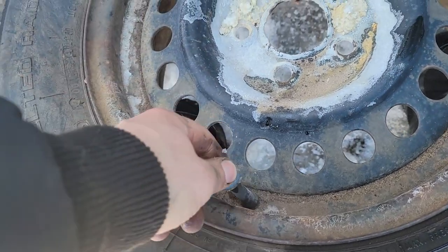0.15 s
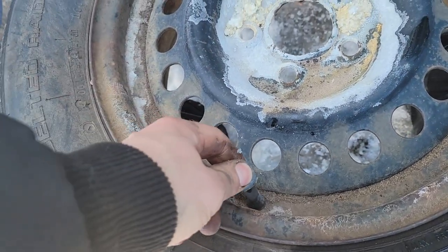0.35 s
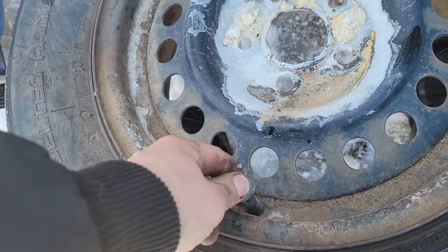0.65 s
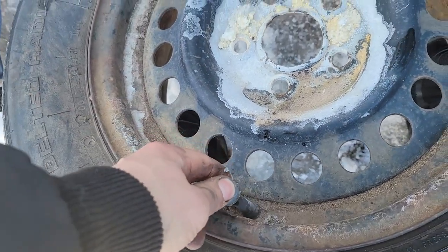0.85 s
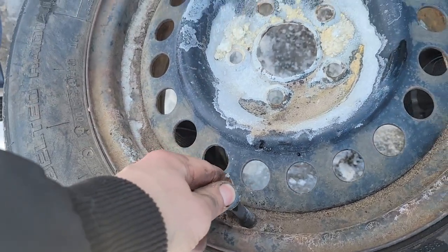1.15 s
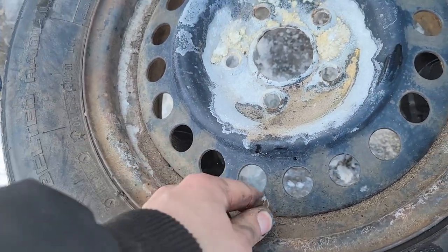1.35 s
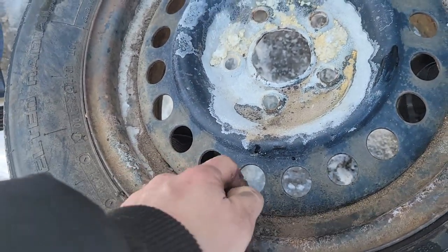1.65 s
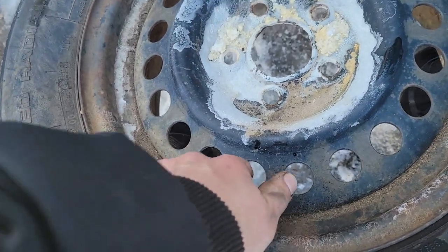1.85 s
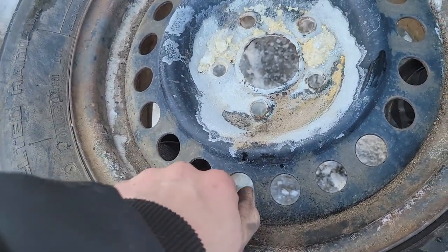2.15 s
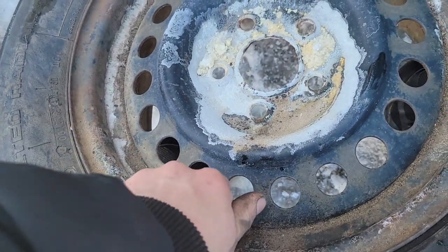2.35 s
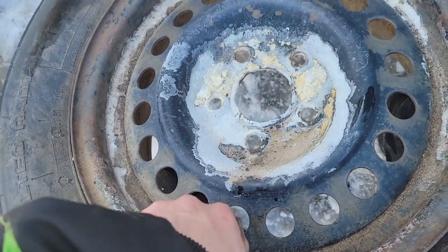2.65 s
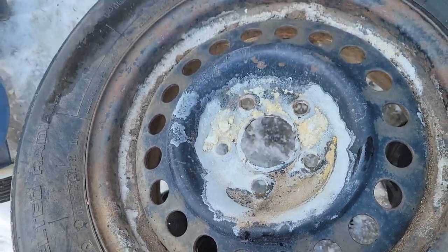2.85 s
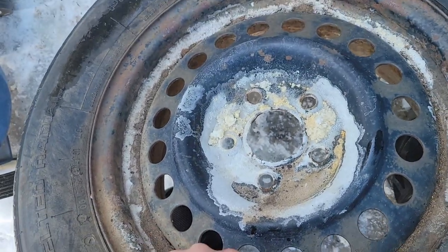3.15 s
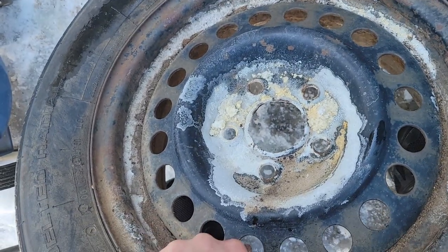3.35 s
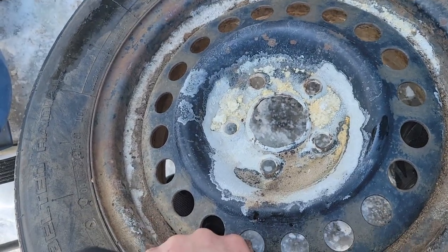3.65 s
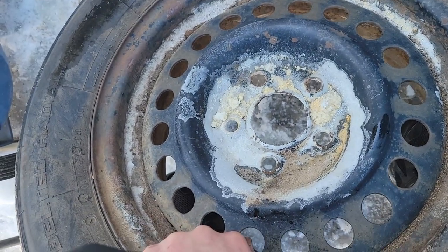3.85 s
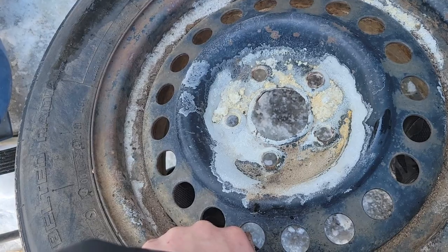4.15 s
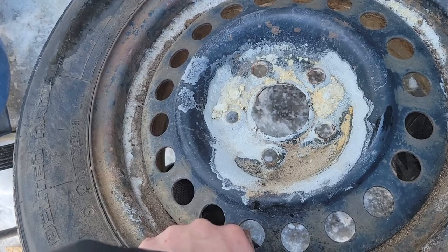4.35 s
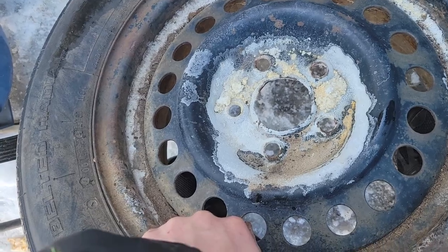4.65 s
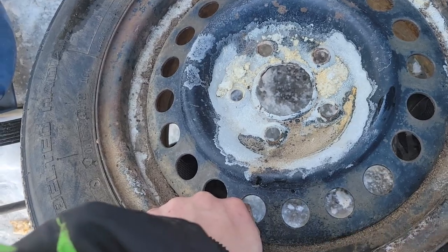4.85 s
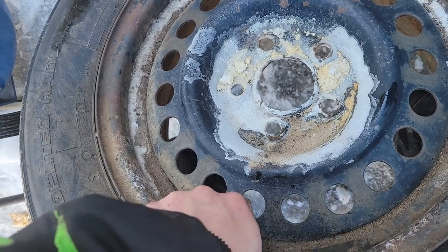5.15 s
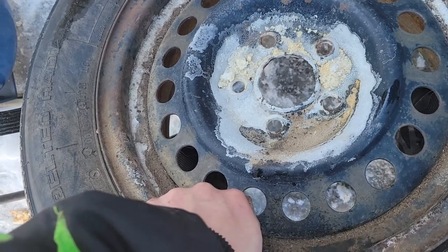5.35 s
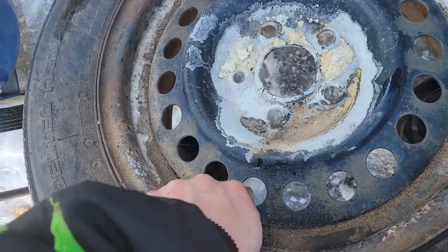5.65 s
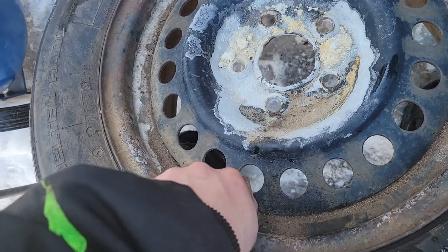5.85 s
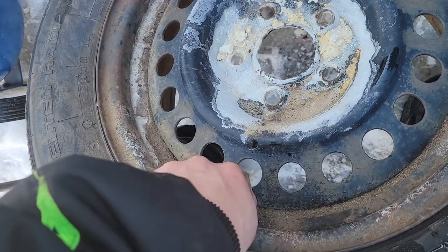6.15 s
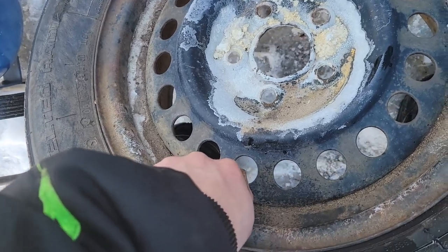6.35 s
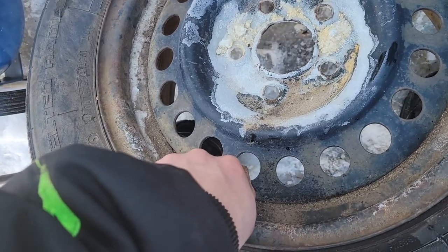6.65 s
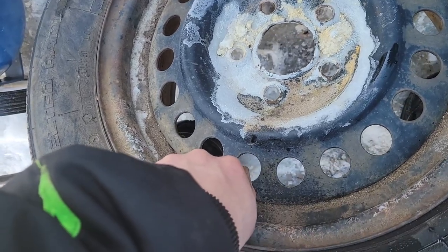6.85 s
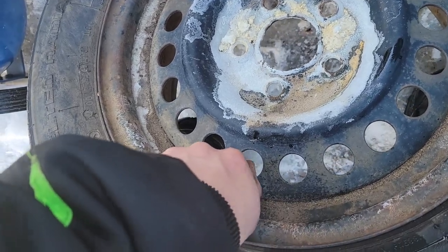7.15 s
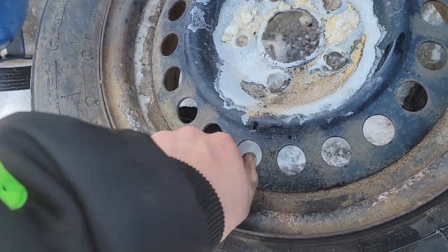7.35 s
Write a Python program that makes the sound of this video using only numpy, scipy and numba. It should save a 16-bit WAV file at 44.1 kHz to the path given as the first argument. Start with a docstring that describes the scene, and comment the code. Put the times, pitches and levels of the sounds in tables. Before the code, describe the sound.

A close stereo microphone hears sputtering compressed air at a tire valve, several short hisses and a sharp snapping release. Metal ticks and light brushing lead to a smooth steady fill that slowly weakens and dulls, pushed slightly stronger late on. Then the chuck blasts off with a very loud crack and a short rub. A lumpy engine idles low throughout in the open air.

```python
"""Air spits past a badly seated chuck on the valve of a car tyre, close up, then fills the tyre steadily.
Hisses are noise shaped by colours and resonances; each pull-off is a noise blast ended by a damped swing.
Brass ticks are short ringing cracks, brushes are grainy noise, two low rasps are trains of uneven slips.
Nearby an engine idles, firing pulses ringing its pipe with puffs of noise, over a faint outdoor background."""
import sys
import numpy as np
from scipy import signal
from scipy.fft import rfft, irfft
from scipy.io import wavfile
from scipy.ndimage import uniform_filter1d
from numba import njit

SR = 44100
rng = np.random.default_rng(int(sys.argv[2]) if len(sys.argv) > 2 else 0)


def store_wav(level_fs):
    """Save 16-bit WAV to argv[1]."""
    pcm = np.round(np.clip(np.atleast_2d(level_fs), -1, 1) * 32767)
    wavfile.write(sys.argv[1], SR, pcm.T.astype(np.int16))


N = 331191
T = np.arange(N) / SR  # time [s]

# exhaust puffs, spectrum: (frequency [Hz], level [dB])
EXHAUST_COLOUR = [(25, -20), (50, 12), (70, 2.5), (95, 9.5), (120, 4.5), (200, 3), (235, -9), (310, -9.5),
                  (390, -33.5), (560, -18.5), (1000, -66.5), (2000, -49), (8000, -88.5)]
# exhaust pipe resonances: (frequency [Hz], width [Hz], level [dB])
PIPE_MODES = [(60.5, 30, -15), (89.65, 32.3, 3.5), (141, 35, -21), (195.4, 40, -22), (279, 96, -29.5),
              (523, 150, -35)]
# weak firings of the idle: (time [s], spread to either side [s], dip [dB])
STUMBLES = [(0.125, 0.02, 6), (0.635, 0.02, 4), (1.69, 0.031, 12), (2.38, 0.039, 8), (2.59, 0.076, 7),
            (3.635, 0.02, 13), (3.773, 0.02, 11), (4.677, 0.02, 13), (5.23, 0.02, 2.5), (6.035, 0.02, 7),
            (6.31, 0.025, 4.5), (6.44, 0.02, 6), (6.96, 0.025, 9)]
# unequal firings of the near bank, one entry per cylinder: (level [dB])
CYLINDER_LEVELS = [0.8, 2.4, 1.2]
# outdoor background, spectrum: (frequency [Hz], level [dB])
YARD_COLOUR = [(400, 1), (800, -4), (1150, -5.5), (1400, -16), (1700, -8.5), (2300, -14), (3300, -19.5),
               (4800, -28.5), (7400, -21.5), (9000, -40.5), (15800, -33)]
# spurts of air past the chuck; a negative sag swells:
# (start [s], attack [s], length [s], level before sag [dB], sag [dB], share of power in the top octave [dB])
SPURTS = [(0.146, 0.049, 0.14, -21.5, 40.5, 0), (0.555, 0.023, 0.13, -42.5, 16, -1),
          (0.622, 0.13, 0.8, -33.5, 3, -1.38), (0.69, 0.019, 0.053, -26, 38, -0.5),
          (1.177, 0.067, 0.4, -21.5, 11, -0.5), (1.277, 0.013, 0.03, -23, 20.5, -0.5),
          (1.463, 0.074, 0.087, -29, 7, -0.3), (1.563, 0.011, 0.11, -40.5, 12, -5),
          (1.694, 0.015, 0.076, -46.5, -1.5, -1), (2.476, 0.03, 0.17, -43, 12.5, -2.5),
          (2.648, 0.023, 0.06, -31, -11, -1), (2.686, 0.033, 0.2, -30, 14.5, -3),
          (7.183, 0.022, 0.05, -34, -2, -2)]
# leaking air, spectrum: (frequency [Hz], level [dB])
LEAK_COLOUR = [(300, -5.5), (800, -8), (1200, -5.5), (2400, -4.5), (3000, -2.5), (4600, -3), (7000, 1.5),
               (8600, -5.5), (10000, -10.5), (12500, -3.5), (15500, -6)]
# resonances of the gap, which change with the angle of the chuck:
# (start [s], end [s], frequency [Hz], width [Hz], level relative to the leak [dB])
GAP_MODES = [(0.137, 0.3, 4100, 900, -15.5), (0.146, 0.3, 7800, 980, -6), (0.14, 0.3, 14300, 1500, -2),
             (0.69, 0.95, 14600, 2000, -12), (0.56, 0.75, 7900, 700, -13.5), (0.685, 0.758, 4130, 900, -19),
             (0.696, 1.02, 1920, 350, -16), (0.765, 1.2, 6600, 1800, -28), (1.208, 1.31, 13800, 3000, -2.5),
             (1.214, 1.566, 12500, 800, -13.5), (1.322, 1.55, 6480, 1300, -13),
             (1.253, 1.414, 4204, 1500, -14.5), (1.692, 1.78, 6600, 890, -7),
             (2.469, 2.78, 6020, 998, -9.5), (2.477, 2.655, 12700, 994, -5), (7.175, 7.215, 3500, 500, -13)]
# hand, sleeve and hose on the rim: (middle [s], spread to either side [s], level [dB], centre [Hz])
BRUSHES = [(0.373, 0.051, -69, 2530), (1.89, 0.059, -70, 6440), (1.908, 0.064, -77, 12900),
           (2.08, 0.085, -64, 1870), (2.136, 0.012, -51.5, 2500), (2.14, 0.0061, -61, 6950),
           (3.79, 0.0041, -46.5, 596), (4.755, 0.0061, -49.5, 750.4), (7.343, 0.1, -52, 3970),
           (7.484, 0.047, -46, 3150)]
# chuck knocking on the valve stem: (time [s], level [dB], ring [Hz], rim thud relative to the tick [dB])
TICKS = [(1.294, -14, 7800, -15), (1.6876, -29, 6350, -28), (1.7993, -30, 3800, -15),
         (1.8342, -27.5, 4450, -19), (1.8456, -40, 4550, -7), (1.861, -42, 4060, -3),
         (1.968, -35, 6700, -18), (2.147, -43, 5000, -8), (2.386, -30.5, 4900, -7.5),
         (2.415, -44, 6530, -10.5)]
# chuck pulled off: (time [s], blast length [s], blast level [dB], snap level [dB], snap pitch [Hz])
RELEASES = [(1.555, 0.0093, -12, -4.5, 540), (7.161, 0.0183, -11, -0.5, 800)]
# blast of line pressure, spectrum: (frequency [Hz], level [dB])
BLAST_COLOUR = [(120, -36), (200, -6), (1290, 0.5), (1900, -5), (4160, 0), (5470, -1), (6330, 1),
                (8180, 1.5), (9640, -10), (12200, 0), (15800, 2)]
# jolted wheel, spectrum: (frequency [Hz], level [dB])
WHEEL_COLOUR = [(200, -3.5), (420, 1), (620, -3.5), (950, -3.5), (1400, -7), (3000, -9.0), (12000, -43.5)]
# air through the seated valve, spectrum: (frequency [Hz], level [dB])
FILL_COLOUR = [(500, -12), (1200, -19), (1850, -29), (2400, -8), (3000, -3.5), (4200, -4), (5600, 0),
               (6900, 1.5), (8400, -5.5), (10200, -3), (12400, 2.5), (14000, 3), (15600, -2.5)]
# modes of the valve bore: (fade-in [s], fade-out [s], frequency [Hz], width [Hz], level relative to the hiss [dB])
VALVE_MODES = [(2.43, 4, 6000, 930, -6.5), (3.3, 4.5, 5600, 330, -9.5), (2.7, 4.03, 12100, 1200, -7.5),
               (4.05, 7.2, 4840, 330, -10), (6.1, 8.2, 4790, 140, -17), (4.33, 7.2, 11000, 350, -16),
               (4.18, 8.3, 15000, 630, -11)]
# air modes inside the tyre: (frequency [Hz], width [Hz], level [dB])
CAVITY_MODES = [(1130, 36, 9), (1293, 13, 6.5), (1451, 8.3, 9.5), (1637, 10.4, 3.5), (2109, 20.5, 7.5),
                (2740, 68, 4), (3180, 70, -20)]
# rubbing: (start [s], length [s], level [dB], resonance [Hz], scratchy share [dB])
RUBS = [(5.585, 0.23, -38, 870, -44), (7.428, 0.12, -38.5, 780, -19)]

# firings of one cylinder bank: mean rate slowly sinking, with a periodic swing (hunting) around it
IDLE_HZ, IDLE_SAG_HZ_PER_S, PHASE_DELAY_S = 20.145, 0.053, 0.032
HUNT_HZ, HUNT_PERIOD_S, HUNT_PEAK_S = 0.45, 1.25, 0.8
BOOM_DB, PUFF_DB, PUFF_DECAY_S, FAR_BANK_DB = -30.5, -38, 0.008, 0.5
SAG_S, SHUT_S = 0.085, 0.013  # the hand presses the gap narrower, then shuts it
SEATED_S, SEAT_RISE_S, FILL_DB, FILL_TOP_DB = 2.71, 0.23, -38, -4  # levels as the fill starts
FILL_SAG_DB_PER_S, TOP_SAG_DB_PER_S = 0.5, 0.6  # weaker and duller as the tyre fills
PUSH_S, PUSH_RISE_S, PUSH_DB = 5.83, 0.056, 1.5  # a firmer push opens the valve wider
MODE_FADE_S = 0.65  # each valve resonance comes and goes over this time
TOP_HZ = 15950  # upper limit of the whole sound


def undb(db):
    """Decibels to gain."""
    return 10 ** (np.asarray(db) / 20)


def unit(x):
    """Scale to rms 1."""
    return x / np.sqrt(np.mean(x ** 2))


def gate(start, end, rise, fall):
    """Opens at start within rise seconds; dies away exponentially after end."""
    return np.clip((T - start) / rise, 0, 1) * np.exp(-np.maximum(T - end, 0) / fall)


def ease(start, rise):
    """A smooth step from 0 to 1."""
    return np.sin(np.pi / 2 * np.clip((T - start) / rise, 0, 1)) ** 2


def walk(rate):
    """Smooth chance with a spread near 1, given a new target rate times a second."""
    count = int(N / SR * rate) + 2
    return 1.2 * np.interp(T * rate, np.arange(count), rng.standard_normal(count))


def colour(x, points):
    """Shape a sound by (frequency [Hz], level [dB]) points, falling off under the lowest; rms 1."""
    hz, db = np.transpose(points)
    f = np.maximum(np.arange(N // 2 + 1) * SR / N, 1)
    gain = undb(np.interp(np.log(f), np.log(hz), db))
    gain = gain * np.minimum(f / hz[0], 1)
    return unit(irfft(rfft(x, N) * gain, N))


def ring(x, hz, width):
    """A fixed resonance, gain 1 at its centre."""
    return signal.lfilter(*signal.iirpeak(min(hz, SR / 2 - 1000), hz / width, fs=SR), x)


def band(x, hz, width):
    """A resonance with steep sides; rms 1."""
    return unit(ring(ring(x, hz, width), hz, width))


@njit
def glide(x, hz, width):
    """A resonance whose centre and width move."""
    y, b, l = np.empty(len(x)), 0., 0.  # output, band and low states
    for i in range(len(x)):
        g, k = np.tan(np.pi * hz[i] / SR), width[i] / hz[i]
        v = (b + g * (x[i] - l)) / (1 + g * (g + k))
        b, l, y[i] = 2 * v - b, l + 2 * g * v, k * v
    return y


def scatter(x, t60, direct):
    """Direct sound plus dense reflections that differ for the two microphones: a fine comb, level overall."""
    t = np.arange(SR // 2) / SR
    response = rng.standard_normal((2, len(t))) * undb(-60 * t / t60)
    response /= np.linalg.norm(response, axis=1, keepdims=True)
    response[[0, 1], [12, 0]] += direct  # 12 samples later on the left
    lead = 128  # samples of room for what the levelling spreads ahead of the onset
    spectrum = rfft(np.pad(response, ((0, 0), (lead, 0))))
    spectrum /= np.sqrt(uniform_filter1d(np.abs(spectrum) ** 2, size=200, axis=1))
    return signal.oaconvolve(np.atleast_2d(x), irfft(spectrum), axes=1)[:, lead:lead + N]


def jet(spread):
    """Turbulence mirrored by the steel wheel, with a diffuse share."""
    mirrored = scatter(rng.standard_normal(N), t60=0.14, direct=0.39)
    return unit(mirrored + spread * rng.standard_normal((2, N)))


def brighten(x, top_db):
    """Give the top octave its share of the power: a narrower gap hisses higher."""
    top = signal.sosfiltfilt(signal.butter(4, 10500, "high", fs=SR, output="sos"), x)
    share = np.clip(undb(top_db) ** 2, 0, .95)
    return unit(top) * np.sqrt(share) + unit(x - top) * np.sqrt(1 - share)


def engine():
    """A lumpy, hunting idle: near-bank firings boom in the pipe, both banks puff, some firings are weak."""
    hunting = HUNT_HZ * np.cos(2 * np.pi * (T - HUNT_PEAK_S) / HUNT_PERIOD_S)
    bank_hz = IDLE_HZ - IDLE_SAG_HZ_PER_S * T + hunting
    turns = np.cumsum(bank_hz) / SR - PHASE_DELAY_S * IDLE_HZ  # one firing per whole number
    dip_db = sum(db * np.exp(-((T - s) / spread) ** 2 / 2) for s, spread, db in STUMBLES)

    firings = np.gradient(np.floor(turns + 0.0068 * walk(20)))  # slightly uneven timing
    cylinder_db = np.take(CYLINDER_LEVELS, np.round(turns).astype(int), mode="wrap")
    pulses = firings * undb(0.5 * walk(28) - dip_db + cylinder_db)
    boom = sum(undb(db) * band(ring(pulses, hz, width), hz, width) for hz, width, db in PIPE_MODES)

    def puff(phase):
        """Gas bursts out at each firing and dies away."""
        return np.exp(-(phase % 1) / IDLE_HZ / PUFF_DECAY_S)

    gas = puff(turns) + undb(FAR_BANK_DB) * puff(turns + .5) + 0.18  # banks alternate over a steady flow
    gas = gas * undb(1.8 * walk(25) - 0.21 * dip_db)
    puffs = gas * (rng.standard_normal(N) + 0.5 * rng.standard_normal((2, N)))
    return unit(boom) * undb(BOOM_DB) + undb(PUFF_DB) * colour(puffs, EXHAUST_COLOUR)


def yard():
    """Faint outdoor background: wide noise with a slowly wandering level."""
    air = rng.standard_normal(N) + rng.standard_normal((2, N))
    return colour(air, YARD_COLOUR) * undb(-62.0 + 3.2 * walk(5.3))


def spurts():
    """Each spurt swells, sags and is shut off; gives their joint strength and the top octave's share [dB]."""
    power, top = 1e-14, 0
    for s, attack, length, db, sag_db, top_db in SPURTS:
        sag = sag_db * (1 - np.exp(-np.maximum(T - s - attack, 0) / SAG_S))
        shut = np.exp(-np.maximum(T - s - length, 0) / SHUT_S)
        spurt = ease(s, attack) * undb(db - sag) * shut
        power = power + spurt ** 2
        top = top + spurt ** 2 * top_db
    return np.sqrt(power), top / power


def leaks():
    """Air sputters through the gap between chuck and valve and rings its resonances."""
    strength, top_db = spurts()
    hiss, power = brighten(colour(jet(spread=0.36), LEAK_COLOUR), top_db), 1
    whistling = jet(spread=0.25)
    for start, end, hz, width, db in GAP_MODES:
        share = gate(start, end, 0.019, 0.022) * undb(db)
        hiss = hiss + band(whistling, hz, width) * share
        power = power + share ** 2
    # stronger leaks sputter more
    sputter_db = 1.5 * strength / strength.max() * walk(260)
    return hiss / np.sqrt(power) * strength * undb(sputter_db + 1.43)


def brushes():
    """Hand, sleeve and hose brush and bump the rim: soft grainy swishes of noise."""
    grain = rng.standard_normal((2, N)) * undb(1.9 * walk(370))
    grain = signal.sosfilt(signal.butter(6, 8200, fs=SR, output="sos"), grain) + 0.32 * grain
    out = 0
    for s, spread, db, hz in BRUSHES:
        stroke = np.exp(-((T - s) / spread) ** 2 / 2)
        out = out + unit(ring(grain, hz, 1.45 * hz)) * undb(db) * stroke
    return out


def ticks():
    """Brass on brass: a tiny crack that rings briefly and thuds into the rim."""
    out = np.zeros((2, N))
    age = np.arange(SR // 10) / SR
    for s, db, hz, thud_db in TICKS:
        decay = np.exp(-age / 0.0011) + 0.088 * np.exp(-age / .012)
        crack = rng.standard_normal((2, len(age))) * decay
        tick = ring(ring(crack, hz, 800), hz, 3000)
        tick = tick + 0.52 * ring(ring(crack, 3200, 900), 3200, 2000)
        tick = tick + 0.26 * ring(ring(crack, 5500, 2000), 6300, 2000)
        knock = rng.standard_normal(len(age)) * np.exp(-age / 0.0071)
        thud = ring(ring(knock, 350, 700), 410, 700)
        both = tick / np.abs(tick).max() + undb(thud_db) * thud / np.abs(thud).max()
        start = int(s * SR)
        out[:, start:start + len(age)] += undb(db - 1.0) * both
    return out


def releases():
    """Full line pressure blasts out until the valve snaps shut with one heavily damped swing, jolting the wheel."""
    air, out = colour(jet(spread=0.98), BLAST_COLOUR), 0
    wheel = colour(rng.standard_normal(N) + 2.0 * rng.standard_normal((2, N)), WHEEL_COLOUR)
    for s, length, blast_db, snap_db, snap_hz in RELEASES:
        shut = s + length
        age = np.maximum(T - shut, 0)
        snap = np.sin(2 * np.pi * snap_hz * age) * np.exp(-age * snap_hz / 0.43)
        jolt = wheel * undb(-16.0) * gate(shut, shut, 0.00051, 0.0083)
        out = out + air * undb(blast_db) * gate(s, shut, 0.22 * length, 0.0057)
        out = out + undb(snap_db) * (snap + jolt)
    return out


def filling():
    """The seated valve hisses, its bore resonances handing over; the tyre's air modes ring along."""
    age, pulled_off = np.maximum(T - SEATED_S, 0), RELEASES[-1][0]
    air, valve = jet(spread=0.32), 0
    for start, end, hz, width, db in VALVE_MODES:
        share = ease(start, MODE_FADE_S) * (1 - ease(end, MODE_FADE_S))
        valve = valve + band(air, hz, width) * share * undb(db + 1.2 * walk(8))
    hiss = brighten(colour(jet(spread=0.12), FILL_COLOUR), FILL_TOP_DB - TOP_SAG_DB_PER_S * age)
    push_db = PUSH_DB * ease(PUSH_S, PUSH_RISE_S)
    flow_db = FILL_DB - FILL_SAG_DB_PER_S * age + push_db + 0.72 * walk(13)
    flow = gate(SEATED_S, pulled_off, SEAT_RISE_S, 0.015) * undb(flow_db)
    # the jet into the tyre starts as the pin is pushed in and weakens as the pressures approach
    cavity = 0
    for hz, width, db in CAVITY_MODES:
        cavity = cavity + undb(db) * ring(rng.standard_normal((2, N)), hz, width)
    inside_db = -59.5 + 12.3 * np.exp(-age / 1.76)
    inside = unit(cavity) * gate(SEATED_S - .08, pulled_off, 0.05, .02) * undb(inside_db)
    return (hiss + valve) * flow + inside


def rubs():
    """Stick and slip: a first jerk, then uneven small slips into a dull resonance, fading as the grip eases."""
    out = np.zeros(N)
    for s, length, db, hz, scratch_db in RUBS:
        times = s + np.r_[0, np.cumsum(rng.gamma(2, .0012, 200))]
        sizes = undb(3 * rng.standard_normal(len(times)))
        sizes[0] = 3.5  # the first jerk
        heard = times < T[-1]
        slips = np.zeros(N)
        slips[(times[heard] * SR).astype(int)] = sizes[heard]
        slips *= gate(s - .01, s + length - .015, .005, 0.0098)
        centre = hz * (1 + 0.08 * walk(18))  # the resonance shifts with the grip
        body = ring(glide(slips, centre, np.full(N, 260.)), hz, 750)
        low = 0.61 * ring(ring(slips, 410, 850), 410, 850)
        rasp = body + low + undb(scratch_db) * ring(slips, 2500, 550)
        # unit() averages over the whole scene: rescale to the length of the rub
        out += unit(rasp) * np.sqrt(min(length, T[-1] - s) * SR / N) * undb(db)
    return np.array([np.roll(out, 10), out])  # 10 samples later at the left microphone


def scene():
    """Air and handling at the wheel, a weak echo from the surroundings, the engine and the yard."""
    near = leaks() + brushes() + ticks() + releases() + filling() + rubs()
    echo = undb(-26.0) * scatter(near, t60=0.12, direct=0)
    return near + echo + engine() + yard()


def record(dry):
    """The right microphone takes more of the top octave; peaks clip at full scale, then all above TOP_HZ is cut."""
    top = signal.sosfiltfilt(signal.butter(4, 11200, "high", fs=SR, output="sos"), dry)
    heard = dry - top + top * undb(np.array([[-3.5], [2.2]]))  # left, right
    cut = signal.ellip(10, .2, 70, TOP_HZ, fs=SR, output="sos")
    return signal.sosfilt(cut, np.clip(heard, -1, 1))


dry = scene()
out = record(dry)
store_wav(out)
```